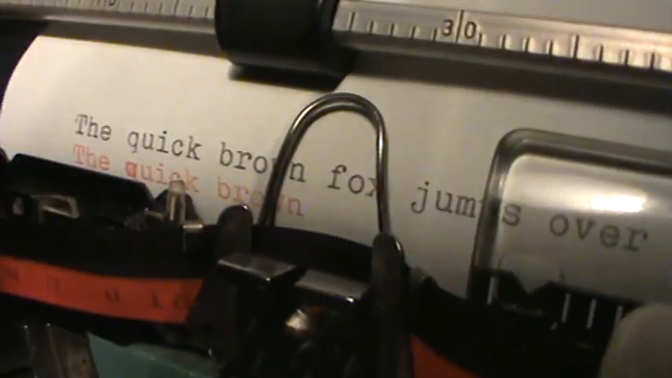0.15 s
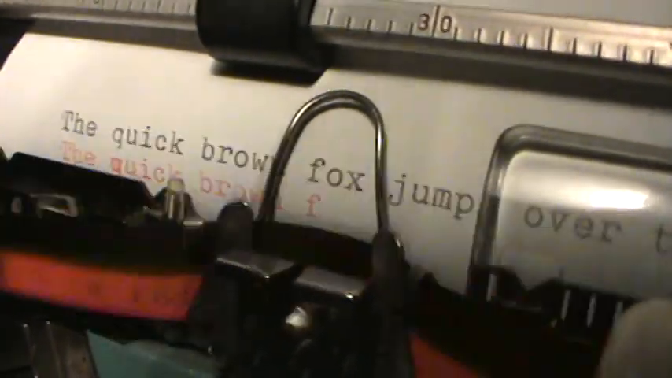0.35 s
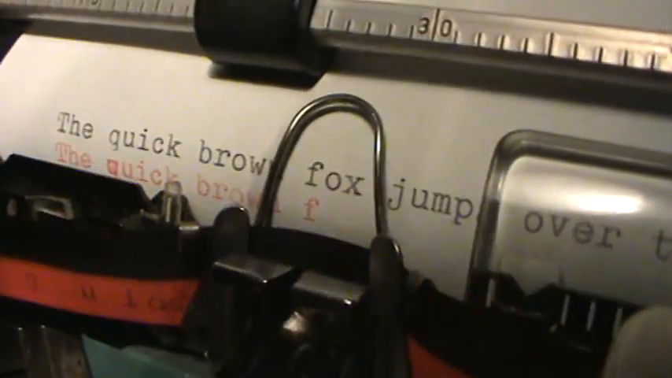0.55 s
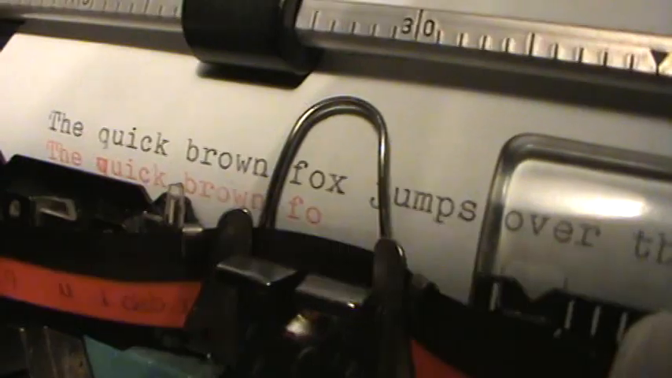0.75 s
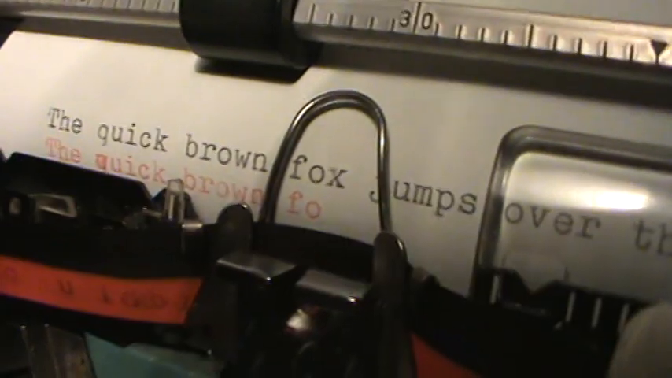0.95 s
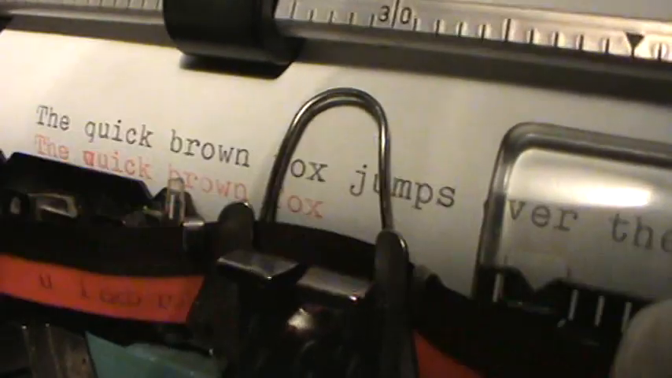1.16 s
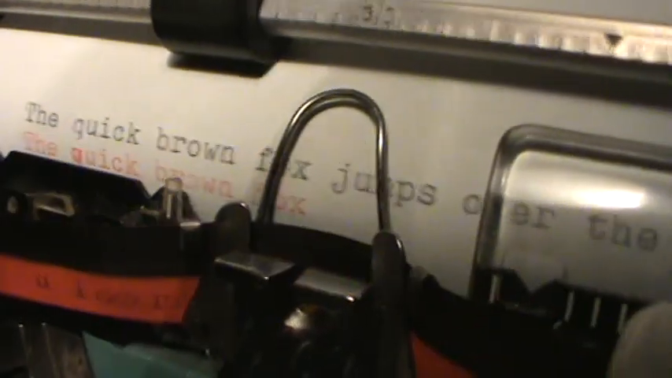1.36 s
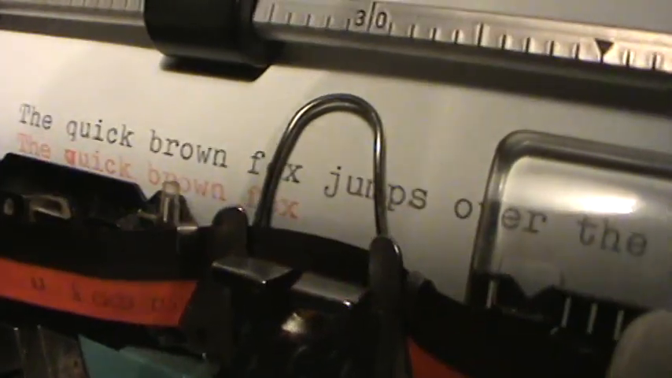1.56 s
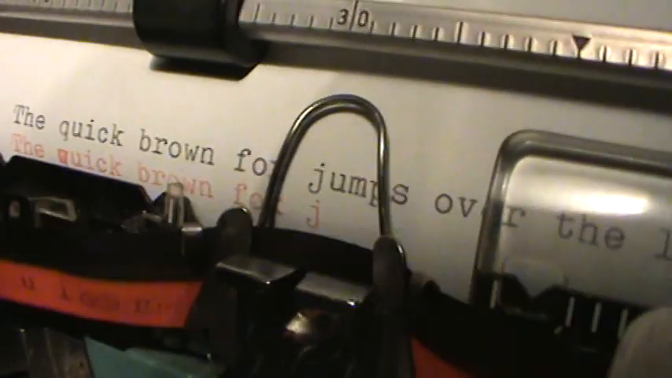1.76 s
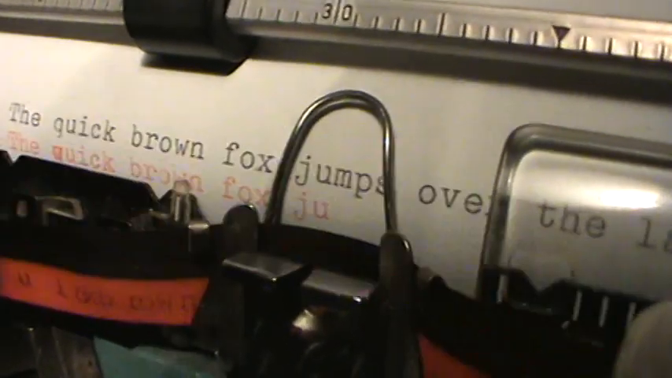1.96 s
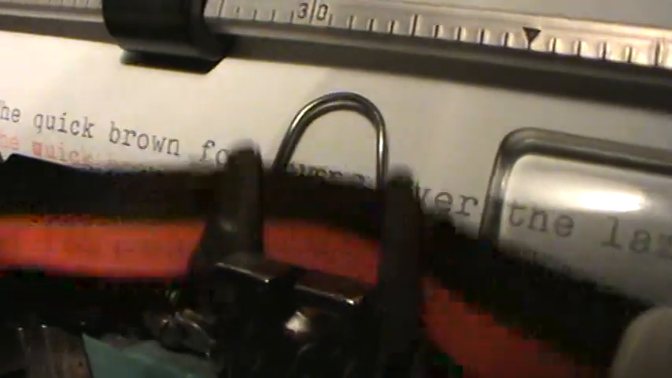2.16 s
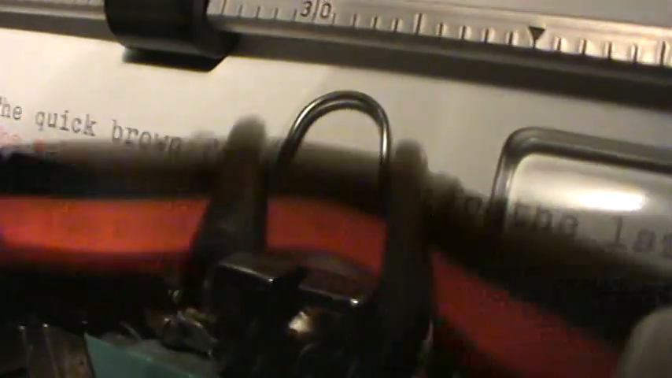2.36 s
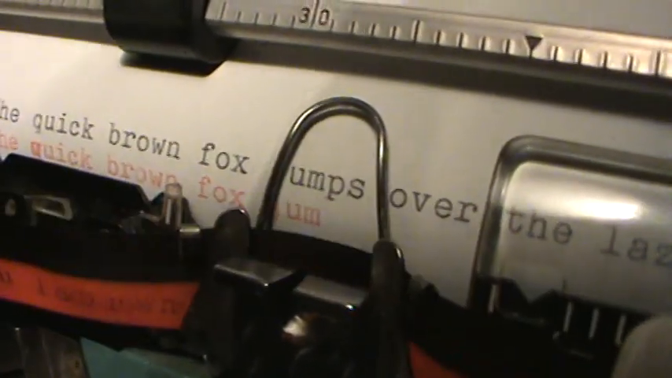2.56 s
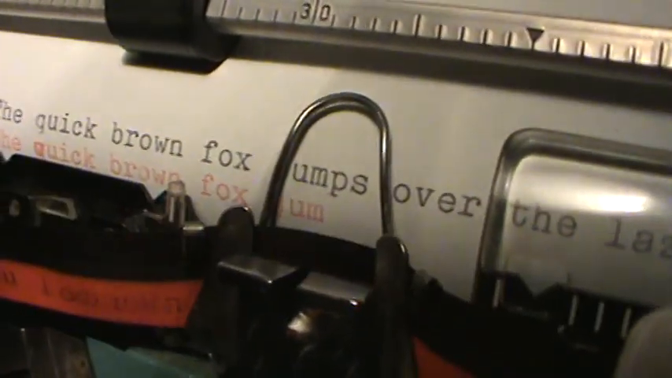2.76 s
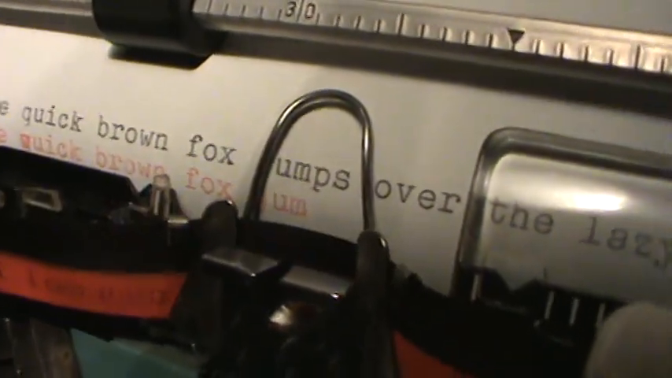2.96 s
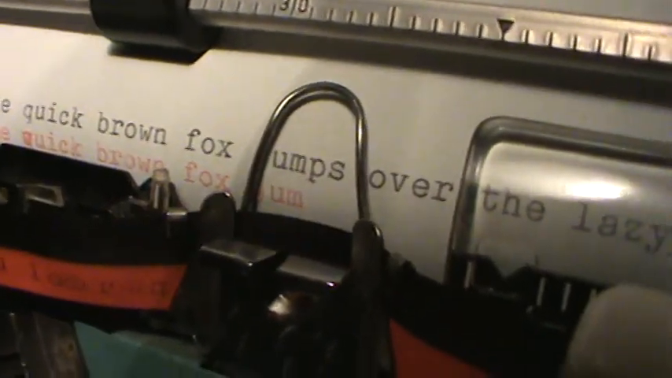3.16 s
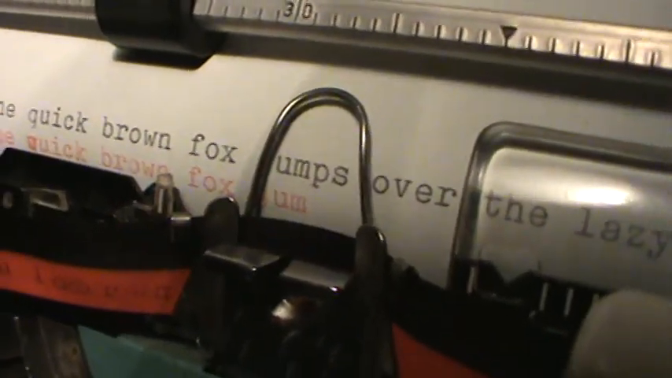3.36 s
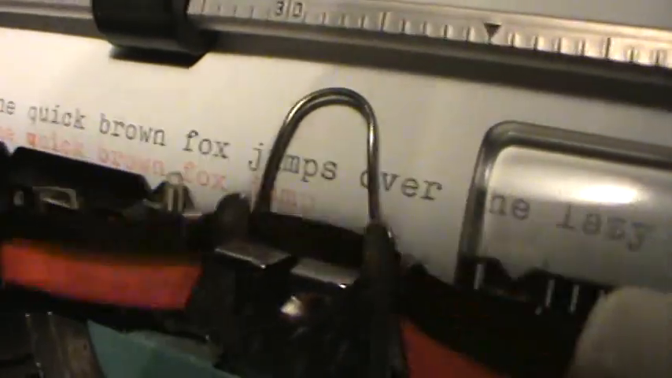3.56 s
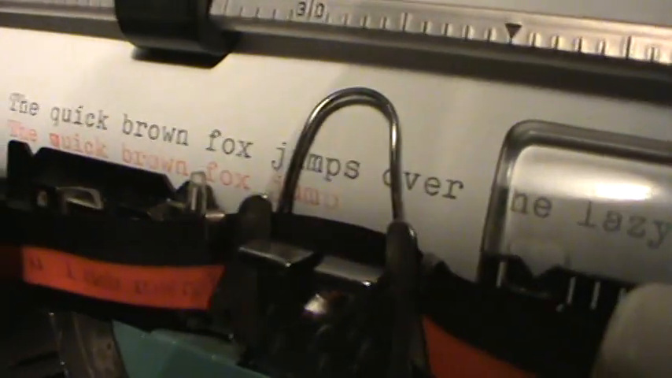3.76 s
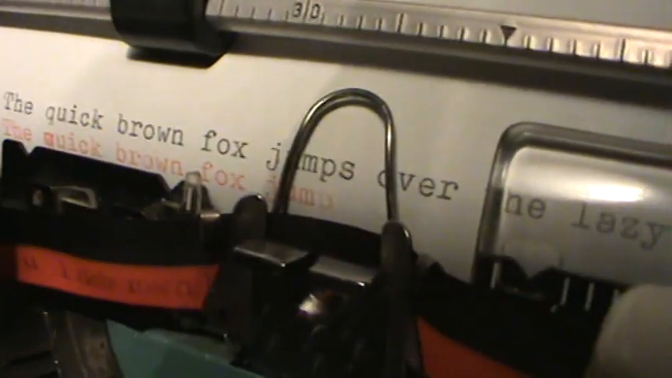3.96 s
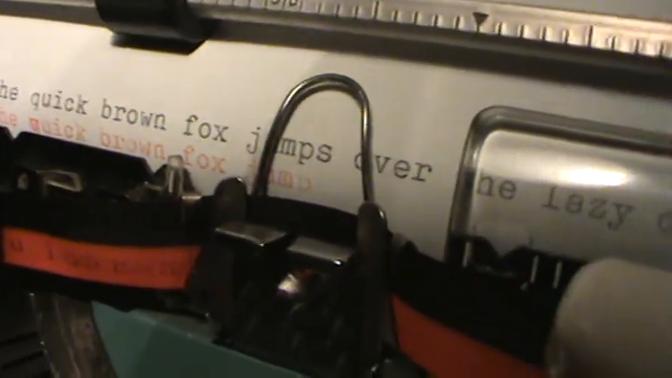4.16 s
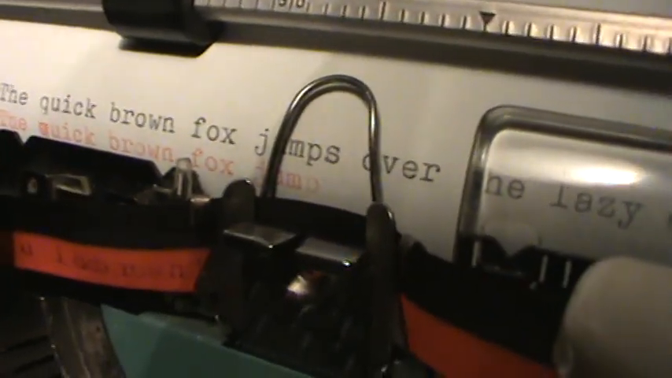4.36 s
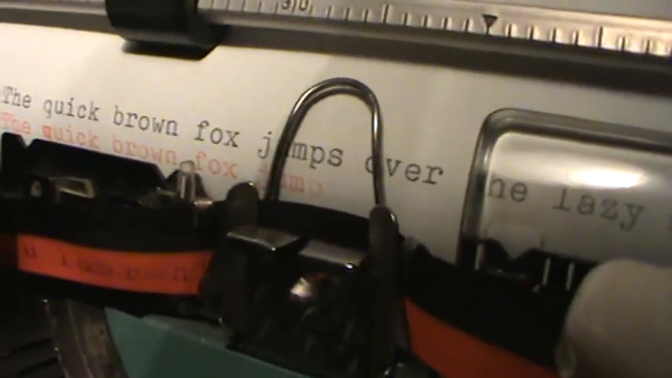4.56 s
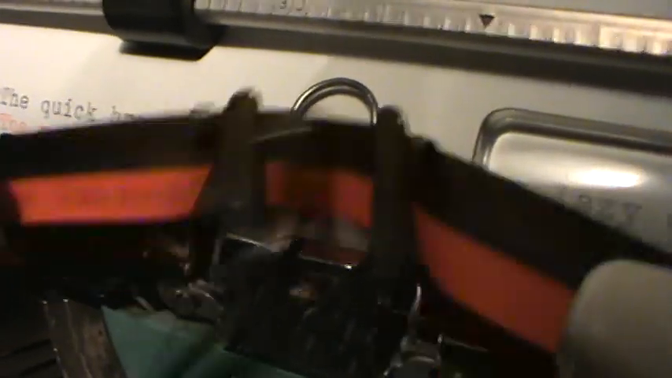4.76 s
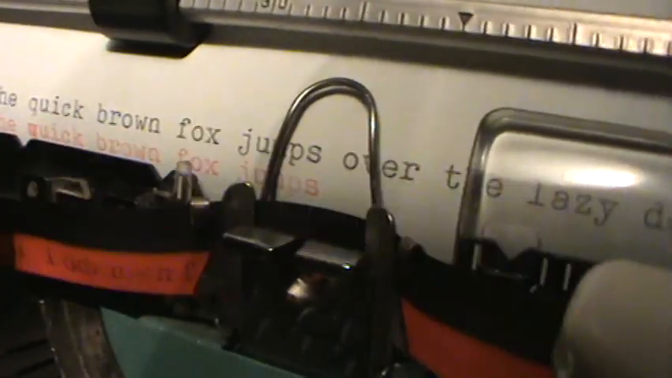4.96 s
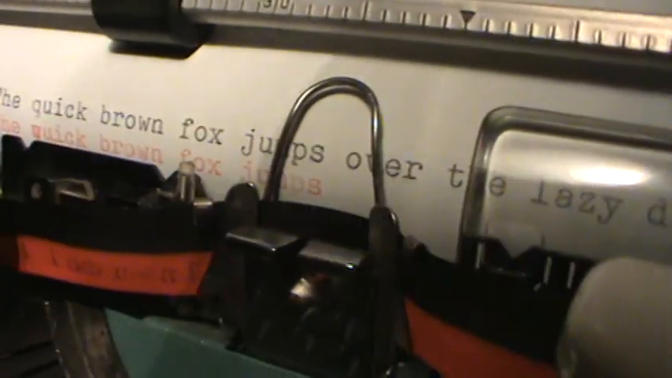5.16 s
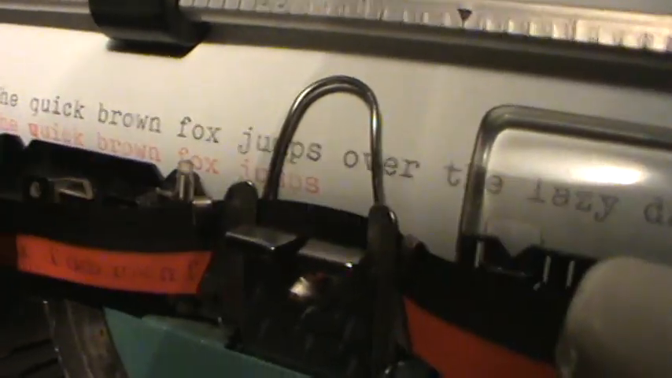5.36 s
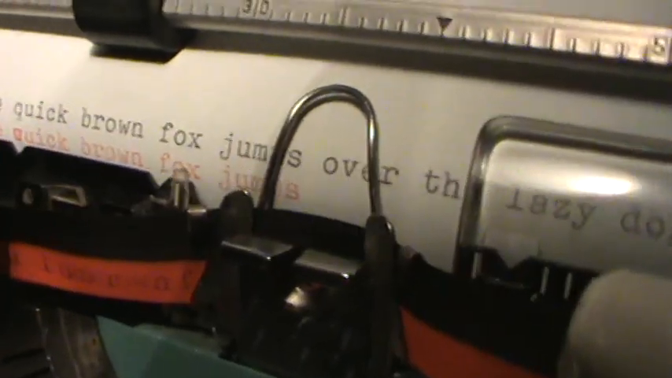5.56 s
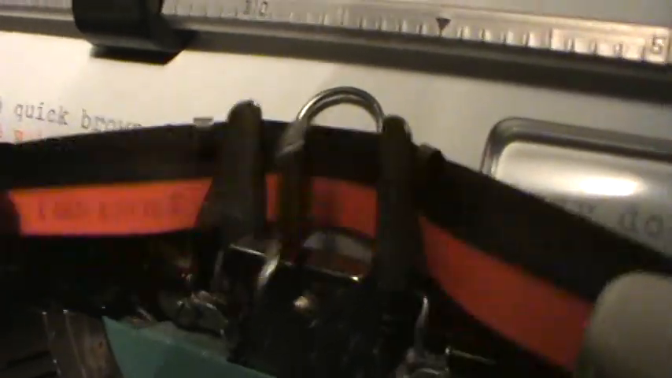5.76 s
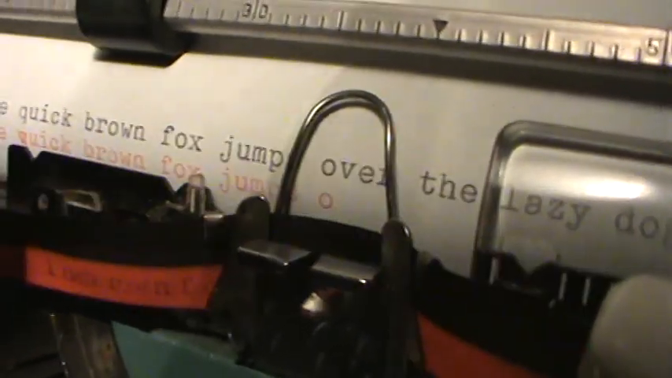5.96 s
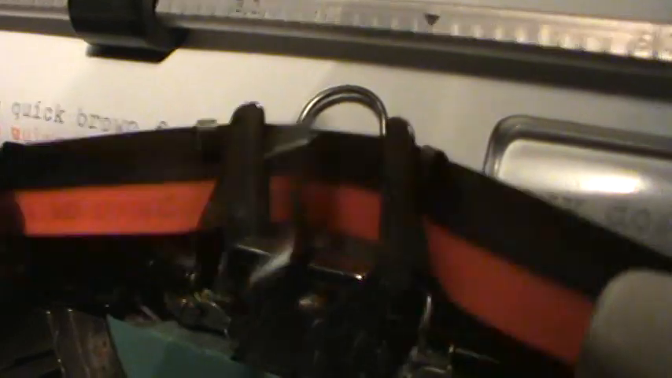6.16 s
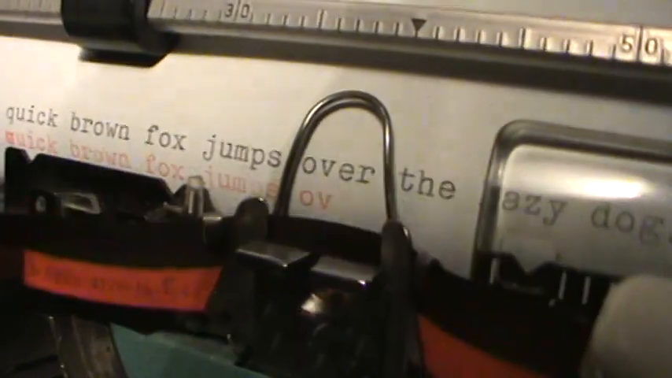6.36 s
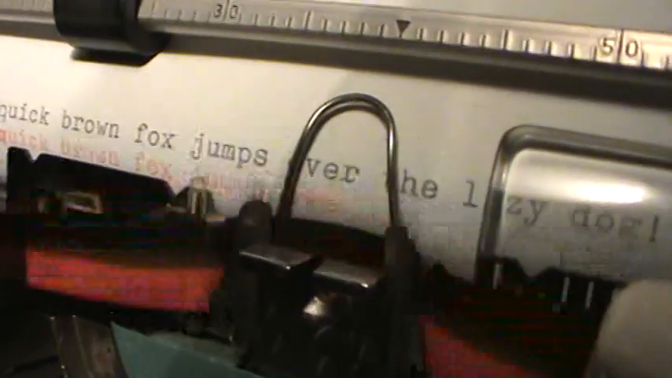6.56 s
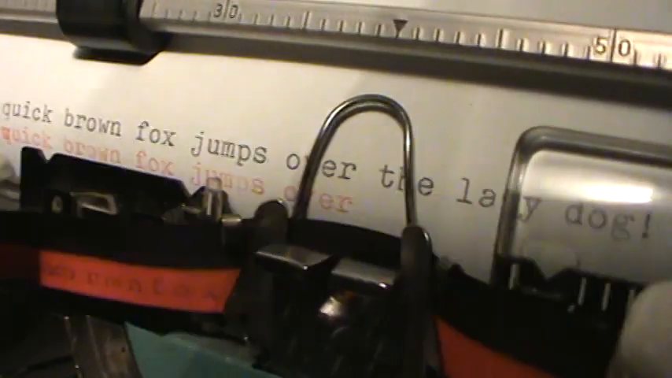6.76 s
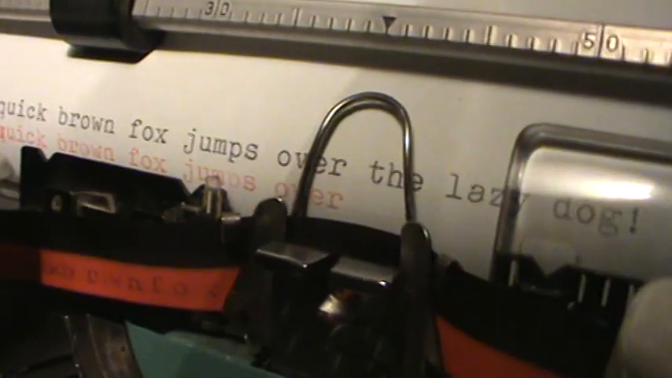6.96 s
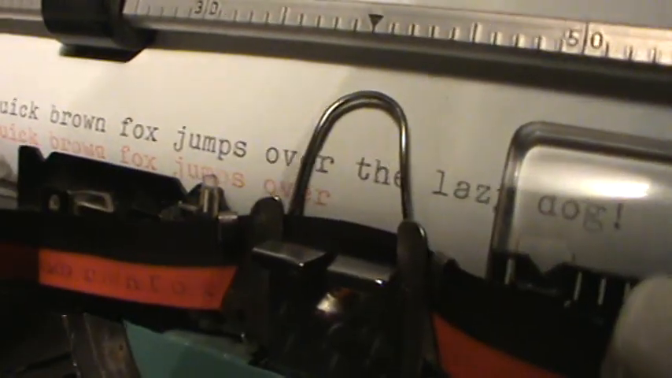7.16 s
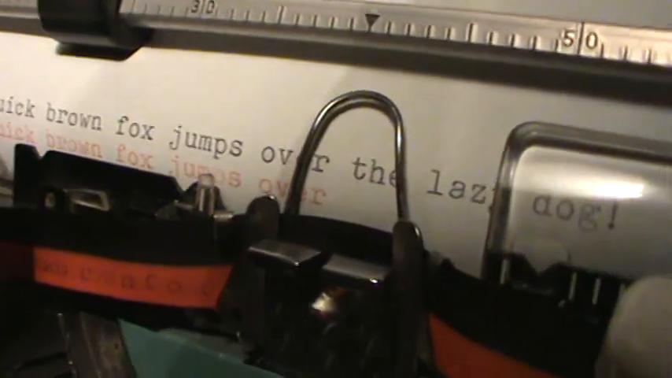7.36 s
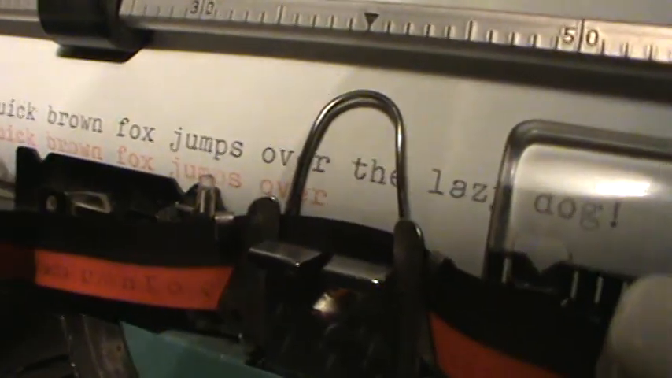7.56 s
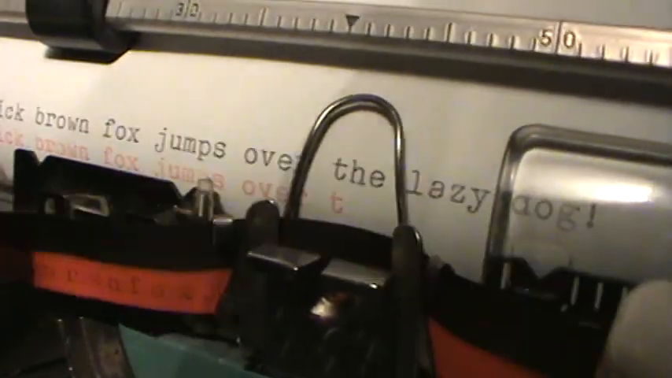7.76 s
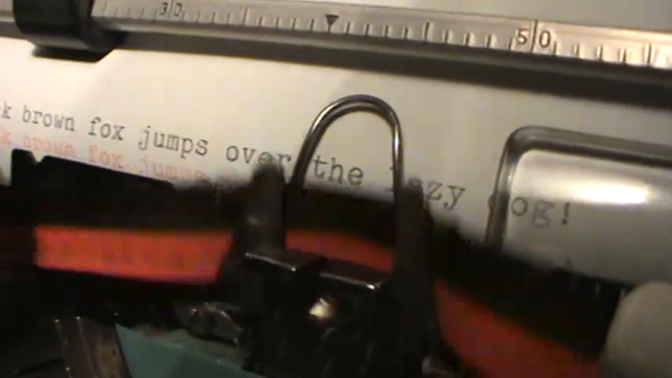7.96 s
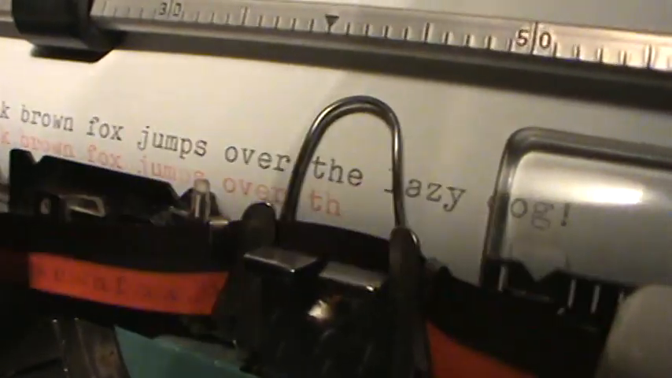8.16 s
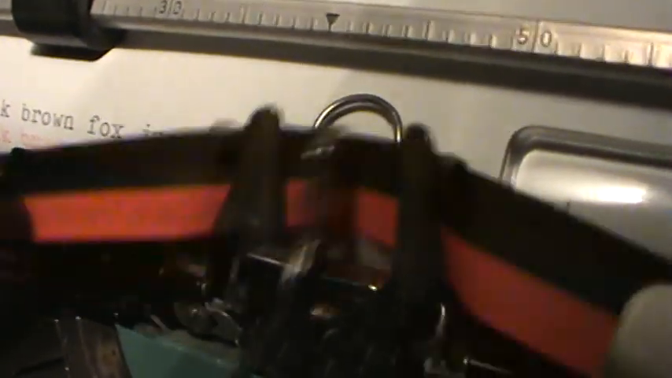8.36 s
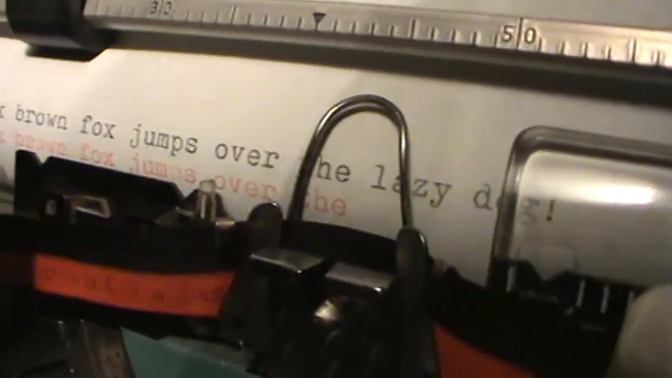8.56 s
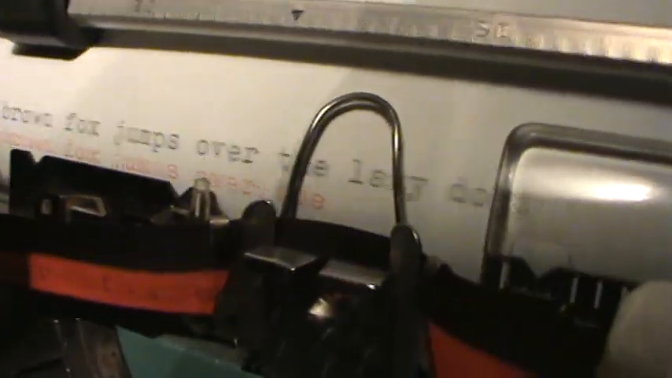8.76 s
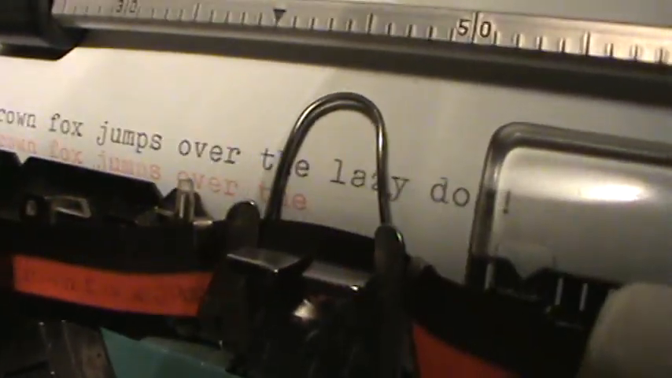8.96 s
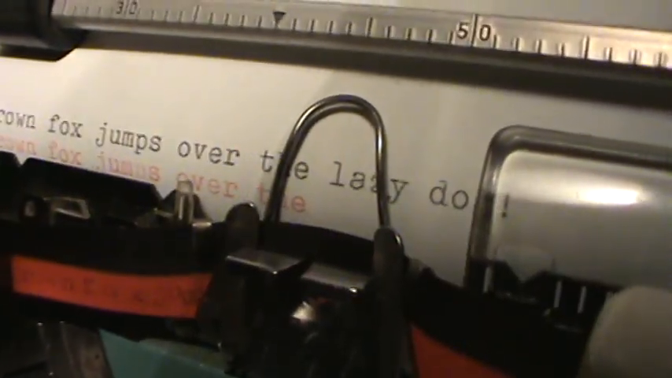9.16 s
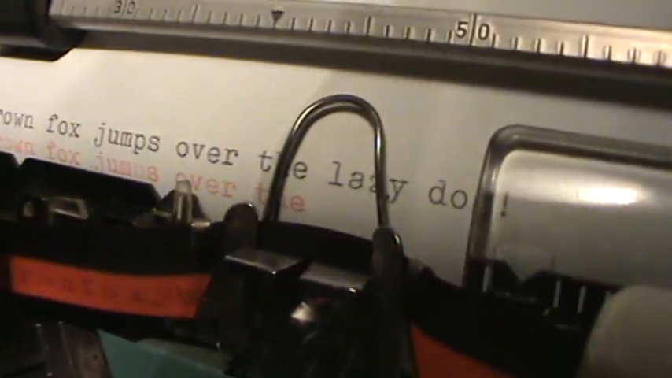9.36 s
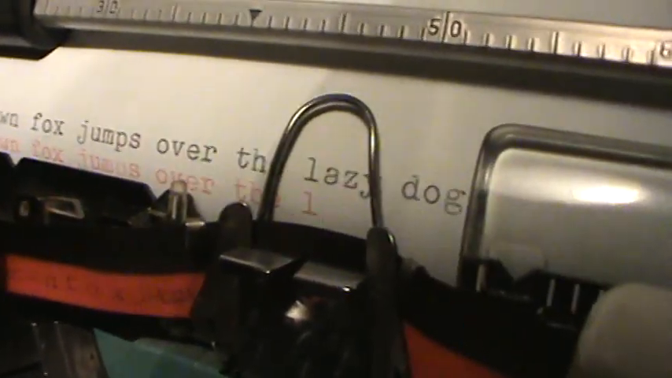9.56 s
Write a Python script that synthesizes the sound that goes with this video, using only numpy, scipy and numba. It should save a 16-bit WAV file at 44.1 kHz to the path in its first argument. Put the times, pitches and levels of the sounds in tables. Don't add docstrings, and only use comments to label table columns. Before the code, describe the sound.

Single typewriter keys clatter and slap paper slowly and irregularly, with occasional hollow space bar thumps, light finger taps and constant low humming.

```python
import sys
import numpy as np
from scipy import signal
from scipy.fft import rfft, irfft, next_fast_len
from scipy.io import wavfile
from scipy.ndimage import uniform_filter1d
from numba import njit

SR = 44100
rng = np.random.default_rng(int(sys.argv[2]) if len(sys.argv) > 2 else 0)


def master_out(mix):
    frames = np.transpose(np.atleast_2d(mix))
    ceiling = np.clip(frames, -1, 1)
    pcm = np.round(ceiling * 32767).astype(np.int16)
    wavfile.write(sys.argv[1], SR, pcm)


def to_linear_factor(level_db):
    exponent = np.asarray(level_db, float) / 20
    return 10 ** exponent


N = 424241
HZ = np.fft.rfftfreq(next_fast_len(N), 1 / SR)

# (1 kHz body re blow [dB], treble re blow [dB], ringing tone [Hz])
LEVER, LINK, BAR, RIBBON = (-9, 0, 9000), (-9.5, -5.5, "link"), (-12, -1, "bar"), (-6.5, 0, 6500)
PAPER, CARRIAGE, PAWL = (0, -3.5, 2910), (-4, -2, 5000), (-4.5, 2.2, 8550)
REST, CUSHION, LATCH = (-4.5, -9.5, 9700), (-8, 0, 4310), (-1, 0.93, 8550)
SPRING, SPACER, STOP = (-0.5, -0.68, 5100), (3.8, -4.5, 1450), (-2.5, -1, 8900)
RACK, PLASTIC, CAP = (-3.5, -1.1, 6100), (8.6, -11, 1700), (4.2, -13, 2130)

# (type meets paper [s], lever trips before [ms], bar falls back after [ms],
# key link tone [Hz], type bar tone [Hz])
LETTERS = [(.272, 40, 120, 5470, 3660), (.65, 42, 97, 2264, 3660), (1.074, 39, 108, 6380, 3670),
           (1.655, 44, 109, 2420, 12090), (1.878, 40, 102, 2610, 6400), (2.1227, 44, 110, 6300, 2744),
           (2.384, 27, 87, 6520, 1960), (3.5252, 61.4, 67, 6330, 2786), (4.7917, 36, 88, 3020, 2850),
           (5.763, 45, 105, 2610, 6910), (6.1892, 47.5, 128, 2370, 6470), (6.469, 50, 94, 2300, 6300),
           (6.628, 65, 100, 6370, 6600), (7.6907, 40, 102, 2410, 3230), (7.923, 42, 103, 3280, 5860),
           (8.3963, 44.3, 89, 2140, 3720), (9.47, 40, 99, 3390, 3630)]
# (trip [dB], slap [dB], carriage step [dB], fall [dB])
FORCES = [(-0.5, 2, -1, -2), (1, -2.5, -6.5, 1.5), (-1.5, 0.5, -3.5, -1), (0, 0, 2.5, -1),
          (0.5, 0.5, 2, -1.5), (-1, 0.5, -2.5, -1.5), (0, -7.5, -8, -3), (-3.5, 1.5, -1, 3),
          (-2, 1.5, 3.5, 2), (1, 0, -1.5, -0.5), (-4, -1.5, 2.5, -1), (-1.5, -1.5, 1, -3),
          (1, -2.5, 1.5, 0), (3.5, 0, 2, -0.5), (1, 0.5, 1.5, -1.5), (-1.5, -2.5, 0.5, 2), (0, -2, 1, 0.5)]
# (pressed [s], bottoms out after [ms], let go after [ms], lands after [ms])
SPACES = [
    (1.287, 14, 96, 105),
    (5.37, 24, 110, 125),
    (6.888, 65, 279, 295),
    (8.694, 30, 95.5, 105.5),
]
# (press [dB], bottom [dB], rack step [dB], let go [dB], landing [dB])
SPACE_FORCES = [
    (7.5, 2.5, 3, -3.5, 3),
    (1.5, 1, 1, 2, 3.5),
    (-4, -18.5, -2, -14.5, -5),
    (-0.5, -2.5, 0, -0.5, -1.5),
]
REBOUND_MS = 34
# (centre [Hz], width [Hz], level [dB])
FRAME = [(93, 34, 2), (142, 58.7, 6), (274.4, 46, -2.5)]
# (centre [Hz], width [Hz], level [dB])
SHELL = [(469.4, 62, -3.5), (528.7, 50.5, -1), (627, 57, -5), (904.4, 24, -10), (1069, 24, -16.5),
         (1477, 42, -10)]


def shape(x, table):
    hz, db = np.transpose(table)
    size = next_fast_len(N)
    gain = to_linear_factor(np.interp(np.log(HZ + 1), np.log(hz), db))
    return irfft(rfft(x, size) * gain, size)[..., :N]


def unit(x):
    return x / np.sqrt(np.mean(x ** 2))


def band(x, lo_hz, hi_hz):
    edges = [lo_hz, min(hi_hz, .45 * SR)]
    passed = signal.sosfilt(signal.butter(2, edges, "band", fs=SR, output="sos"), x)
    return passed * np.sqrt(SR / 2 / (edges[1] - lo_hz))


def ring(x, hz, width_hz):
    return signal.lfilter(*signal.iirpeak(hz, hz / width_hz, fs=SR), x)


def modes(x, table):
    return sum(to_linear_factor(db) * ring(x, hz, width) for hz, width, db in table)


def walk(rate):
    k = int(SR / rate)
    steps = np.repeat(rng.standard_normal(N // k + 1), k)
    return unit(uniform_filter1d(uniform_filter1d(steps, k), k)[:N])


def stereo(mid, side, table):
    side = shape(side, table)
    return np.array([mid + side, mid - side])


def uneven(grain_db, ms, size):
    k = int(ms * SR / 1000) + 1
    luck = np.clip(rng.standard_normal((size, 1, N // k + 1)), -2, 2)
    return uniform_filter1d(np.repeat(to_linear_factor(grain_db * luck), k, axis=2)[..., :N], k)


def chatter(grain_db, grain_ms, count=1):
    grains = uneven(grain_db, grain_ms, size=1)
    patches = uneven(grain_db, 4.5 * grain_ms, size=count)
    return unit(grains * patches * rng.standard_normal((count, 2, N)))


def letter_blows(scatter_db=1.5, detune=.06):
    # (delay [ms], level [dB], rattle length [ms], part)
    trip_rows = [
        (0, -28.5, 22, LEVER),
        (4, -23.5, 10, LINK),
        (18, -25.5, 16, LINK),
    ]
    # (delay [ms], level [dB], rattle length [ms], part)
    slap_rows = [
        (-7.5, -17, 16, BAR),
        (0, -16, 2, PAPER),
        (7.5, -17.5, 23, RIBBON),
    ]
    # (delay [ms], level [dB], rattle length [ms], part)
    move_rows = [
        (29.9, -20.5, 19.5, CARRIAGE),
        (50.6, -29.5, 26, CARRIAGE),
    ]
    # (delay [ms], level [dB], rattle length [ms], part)
    fall_rows = [
        (0, -29, 20.6, REST),
        (0, -21.5, 12.8, CUSHION),
    ]
    groups = (trip_rows, slap_rows, move_rows, fall_rows)
    out = []
    chance = rng.standard_normal((len(LETTERS), sum(len(rows) for rows in groups), 3))
    for (s, lead, fall, link_hz, bar_hz), forces, luck in zip(LETTERS, FORCES, chance):
        own_pitch = {"link": link_hz, "bar": bar_hz}
        stages = [(at, push_db, row)
                  for at, push_db, rows in zip((-lead, 0, 0, fall), forces, groups) for row in rows]
        for (at, push_db, (ms, db, length, part)), (level_luck, treble_luck, pitch_luck) in zip(stages, luck):
            body_db, treble_db, hz = part
            hz = own_pitch.get(hz) or hz * np.exp(detune * pitch_luck)
            out.append((s + (at + ms) / 1000, db + push_db + scatter_db * level_luck,
                        body_db, treble_db + scatter_db * treble_luck, length, hz))
    return out


def space_bar_blows():
    # (level [dB], rattle length [ms], part)
    press, bottom_stop, rack_step = (-39, 15.2, SPACER), (-22.5, 11.7, STOP), (-19, 4, RACK)
    release, landing, rebound = (-24.5, 6.5, LATCH), (-30.5, 24.3, SPACER), (-42, 12, PLASTIC)
    step_ms = 27.5
    out = []
    for (s, bottom, let_go, land), forces in zip(SPACES, SPACE_FORCES):
        press_db, bottom_db, step_db, go_db, land_db = forces
        moments = ((0, press_db, press),
                   (bottom, bottom_db, bottom_stop),
                   (bottom + step_ms, step_db, rack_step),
                   (let_go, go_db, release),
                   (land, land_db, landing),
                   (land + REBOUND_MS, 2 * land_db, rebound))
        for ms, push_db, (db, length, (body_db, treble_db, hz)) in moments:
            out.append((s + ms / 1000, db + push_db, body_db, treble_db, length, hz))
    return out


def blows():
    # (time [s], level [dB], rattle length [ms], part)
    loose_blows = [(.347, -21.5, 19.4, PAWL), (.71, -23, 16.7, RIBBON), (1.056, -20, 10, RIBBON),
                   (2.384, -13, 4, PAPER), (1.138, -26.5, 21, PAWL), (1.846, -31, 24, STOP),
                   (2.433, -26, 16.6, PAWL), (3.486, -5, 14, RIBBON), (3.512, -12.5, 8.6, RIBBON),
                   (5.826, -23, 22.4, PAWL), (6.589, -24, 27, RIBBON), (6.66, -27, 23, PAWL),
                   (8.447, -23, 15, REST), (9.519, -30, 28, CARRIAGE), (.479, -51, 3.8, SPRING),
                   (.846, -42, 4, SPRING), (1.259, -42.5, 3.3, SPRING), (2.311, -49.5, 4.5, SPRING),
                   (2.52, -39.5, 6.2, SPRING), (2.589, -53.5, 6.7, SPRING), (3.703, -50, 7.5, SPRING),
                   (4.986, -40, 3.6, STOP), (5.962, -42.5, 5.3, PAPER), (6.827, -50, 5.6, RACK),
                   (8.107, -51.5, 4.5, PAWL), (8.592, -44, 6.7, SPRING),
                   (.107, -59, 4.9, SPACER), (2.925, -53.5, 6.5, SPRING), (3.111, -54, 12, SPRING),
               (3.8, -47.5, 3, CAP), (4.118, -37.5, 6.8, PLASTIC), (4.17, -49.5, 6, CAP),
               (4.452, -65.5, 10.7, PLASTIC), (2.99, -68, 8, PLASTIC), (6.888, -42, 6, RACK),
               (8.7, -40, 5, RACK), (8.2, -52, 6, SPRING), (6.916, -43, 6.4, SPACER),
               (6.967, -36, 6, CARRIAGE), (7.155, -33, 6.6, LATCH), (7.177, -38, 9, SPACER),
               (8.169, -36.5, 7.3, CUSHION), (8.263, -42, 6, SPACER), (8.31, -41.5, 5.1, SPRING),
               (9.024, -37, 2, RACK)]
    loose = [(s, db, body_db, treble_db, length, hz)
             for s, db, length, (body_db, treble_db, hz) in loose_blows]
    return letter_blows() + space_bar_blows() + loose


def strike_gains():
    # (time from the slap [ms], low and middle [dB], treble [dB])
    strike = [
        (-9, 0, 0),
        (-7, -7, 1),
        (-2.5, -7, 1),
        (-1.2, -14, -11),
        (0, -13, -11),
        (.5, 6, -3),
        (5, 3, -7),
        (9, 0, 0),
    ]
    ms, low_db, treble_db = np.transpose(strike)
    t, slap_s = np.arange(N) / SR, np.array(LETTERS)[:, 0]
    halfway = (slap_s[1:] + slap_s[:-1]) / 2
    since_ms = 1000 * (t - slap_s[np.searchsorted(halfway, t)])
    low = to_linear_factor(np.interp(since_ms, ms, low_db))
    treble = to_linear_factor(np.interp(since_ms, ms, treble_db))
    return np.array([low, low, np.sqrt(low * treble), treble, treble])


def linkage(rise_ms=2.53, rise_share=0.35, sag_db=-4.0, die_ms=2.9, die_share=0.31,
            ring_db=19.5, ring_q=27.0, ring_ms=10, near_db=2.0):
    edges_hz = (700, 1900, 3600, 7000, 10500, 14500)
    source = chatter(grain_db=3.0, grain_ms=1.1, count=6)
    t = np.arange(SR // 8) * 1000 / SR
    drive, parts = np.zeros((5, N)), np.zeros((2, N))
    for s, db, body_db, treble_db, ms, hz in blows():
        span = slice(int(s * SR), min(int(s * SR) + len(t), N))
        fits = span.stop - span.start
        rattle = to_linear_factor(db + sag_db * np.minimum(t / ms, 1))
        dying = np.exp(-np.maximum(t - ms, 0) / (die_ms + die_share * ms))
        env = rattle * dying * np.minimum(t / min(rise_ms, rise_share * ms), 1) ** 2
        shares_db = np.array([body_db, -4.5, 0.34 * treble_db - 2.5, treble_db - 2.5,
                              treble_db - 0.62 * body_db - 8.0])
        own_region = np.arange(5) == np.searchsorted(edges_hz, hz) - 1
        shares_db = shares_db + near_db * own_region
        drive[:, span] = np.hypot(drive[:, span], np.outer(to_linear_factor(shares_db), env[:fits]))
        kick = (env * np.exp(-t / ring_ms))[:fits] * source[-1][:, span]
        parts[:, span] += ring(kick, hz, hz / ring_q)
    regions = (drive * strike_gains())[:, None] * source[:-1]
    clatter = sum(band(*region) for region in zip(regions, edges_hz, edges_hz[1:]))
    push = uniform_filter1d(drive[0], int(.012 * SR), origin=int(0.0054 * SR))
    shake = push * rng.standard_normal((2, N))
    bodies = to_linear_factor(18.5) * modes(shake, FRAME) + to_linear_factor(14.0) * modes(shake, SHELL)
    return to_linear_factor(-0.5) * clatter + to_linear_factor(ring_db) * parts + bodies


def frame_blows():
    # (time [s], level [dB], main tone [Hz], hollow cover re level [dB])
    jolts = [(.631, -16, 194, -12), (1.427, -7.5, 143.4, -2.5), (3.57, -19, 114, -6.5),
             (4.119, -13.5, 182, -19.5), (4.169, -18.5, 179, -23), (6.218, -13.5, 236, -1),
             (6.529, -12.5, 151.6, -7), (7.752, -12, 155, -6.5), (8.722, -15, 108, -6),
             (9.501, -12.5, 142, -7)]
    # (level [dB], main tone [Hz], hollow cover [dB])
    space_thumps = [
        (-32.5, 160, 6.5),
        (-8, 266, -0.5),
        (-9, 286, -1.5),
        (-8, 277, -6.5),
        (-8.5, 150, -9),
    ]
    # (delay [ms], level [dB], main tone [Hz], hollow cover re level [dB])
    trip_thump, step_thump = (18, -24.5, 193, -5), (31, -22.5, 148.5, 5.5)
    out = list(jolts)
    for (s, lead, *_), (trip_db, _, step_db, _) in zip(LETTERS, FORCES):
        for at, push_db, thump in ((-lead, trip_db, trip_thump), (0, step_db, step_thump)):
            ms, db, hz, cover_db = thump
            out.append((s + (at + ms) / 1000, db + push_db, hz, cover_db))
    for (s, bottom, _, land), (press_db, bottom_db, *_, land_db) in zip(SPACES, SPACE_FORCES):
        moments = ((0, press_db), (bottom + 1, bottom_db), (land + 1, land_db),
                   (land + 11, land_db), (land + REBOUND_MS, 2 * land_db))
        for (ms, push_db), (db, hz, cover_db) in zip(moments, space_thumps):
            out.append((s + ms / 1000, db + push_db, hz, cover_db))
    return out


def thumps(push_ms=2.0, spread_db=3.0, t60=0.053):
    out, t = np.zeros((2, N + SR)), np.arange(SR // 4) / SR
    dull = frame_blows()
    chance = rng.standard_normal((len(dull), 2, len(FRAME + SHELL), 2))
    for (s, db, hz, cover_db), luck in zip(dull, chance):
        main_tone = np.sin(2 * np.pi * hz * t) * np.exp(-np.log(1000) * t / t60)
        blow = main_tone * np.array([[1], [.6]])
        for k, (mode_hz, width, mode_db) in enumerate(FRAME + SHELL):
            share_db = -8.5 if k < len(FRAME) else cover_db + 0.5
            size = to_linear_factor(mode_db + share_db + spread_db * luck[:, k, :1])
            turn = 2 * luck[:, k, 1:]
            tone = np.sin(2 * np.pi * mode_hz * (1 + turn / 160) * t + turn)
            blow = blow + size * tone * np.exp(-np.pi * width * t)
        start = int(s * SR)
        out[:, start:start + len(t)] += to_linear_factor(db) * blow * (1 - np.exp(-t * 1000 / push_ms)) ** 2
    return out[:, :N]


def singing(rise_s=.004, side_share=.5):
    # (time [s], level [dB], tone [Hz], time to fade by 60 dB [s])
    steel = [(0.47, -69, 7760, .9), (1.42, -65, 7760, .9), (5.88, -69, 7760, .9), (13, -70, 7760, .8),
             (3.6, -42, 1300, 0.4), (2.39, -40, 9540, 0.2)]
    out, t = np.zeros(N), np.arange(N) / SR
    falls = [(s + fall / 1000, -20.5 + force[-1], 9540, .07)
             for (s, _, fall, *_), force in zip(LETTERS, FORCES)]
    for s, db, hz, t60 in steel + falls:
        span = slice(int(s * SR), int((s + t60) * SR))
        since = t[span] - s
        env = np.clip(since / rise_s, 0, 1) * np.exp(-np.log(1000) * since / t60)
        out[span] += to_linear_factor(db) * env * np.sin(2 * np.pi * hz * since)
    return out * np.array([[1], [side_share]])


def scuffs():
    # (time [s], length [s], level [dB], centre [Hz])
    rubs = [
        (2.93, .2, -68, 9500),
        (9.232, 0.1, -51.5, 830),
        (3.3, 0.031, -68.5, 7000),
        (3.2, 0.07, -55, 1500),
    ]
    out, t = 0, np.arange(N) / SR
    rub = chatter(grain_db=2.5, grain_ms=2)[0]
    for s, length, db, hz in rubs:
        env = np.clip((t - s) / .005, 0, 1) * np.clip(1.4 - (t - s) / length, 0, 1)
        out = out + to_linear_factor(db) * env * band(rub, hz / 2, hz * 2)
    return out


def room(x, low_t60=0.25, high_t60=0.19, low_db=-8.5, high_db=-14.5):
    t, out = np.arange(SR // 2) / SR, 0
    for lo_hz, hi_hz, t60, db in (79, 1510, low_t60, low_db), (1390, 7700, high_t60, high_db):
        fade = np.exp(-np.log(1000) * t / t60)
        tail = band(rng.standard_normal((2, len(t))), lo_hz, hi_hz) * fade
        tail = tail * np.sqrt((hi_hz - lo_hz) / (SR / 2) / np.sum(fade ** 2))
        out = out + to_linear_factor(db) * signal.fftconvolve(x[None], tail, axes=1)[:, :N]
    return out


def motor():
    # (tone [Hz], rms level [dB], wobble [dB])
    hum = [(119.4, -43, 1.0), (242.6, -63, 2), (356.5, -59.5, 2.5), (429.3, -56, 2)]
    out, t = 0, np.arange(N) / SR
    for hz, db, wobble_db in hum:
        level = np.sqrt(2) * to_linear_factor(db + wobble_db * walk(8.1))
        out = out + level * np.sin(2 * np.pi * hz * t + 0.51 * wobble_db * walk(4))
    return out


def camera_ticks(drift_db=3.5):
    # (tone [Hz], width [Hz], level [dB], lost on every second tick [dB])
    pings = [(2300, 240, -59, 11.5), (2760, 200, -60, 2), (3360, 500, -68.5, -3), (5750, 330, -64, 4)]
    first_s, rate_hz = .0068, 29.97
    at = (np.arange(first_s, N / SR - .01, 1 / rate_hz) * SR).astype(int)
    out = 0
    for hz, width, db, weak_db in pings:
        clicks = np.zeros(N)
        weak = weak_db * (np.arange(len(at)) % 2)
        clicks[at] = to_linear_factor(35.0 - weak + 1.5 * rng.standard_normal(len(at)) + drift_db * walk(1.7)[at])
        out = out + to_linear_factor(db) * ring(ring(clicks, hz, width), hz, width)
    return out


def room_air():
    # (frequency [Hz], level per Hz [dB])
    colour = [(20, -10.5), (65, -10.5), (123, -6), (216, -18.5), (434, -21), (520, -28), (950, -37.5),
              (2750, -45.5), (16000, -50.5)]
    return to_linear_factor(-46.5 + .6 * walk(4.2)) * unit(shape(rng.standard_normal((2, N)), colour))


def scene():
    # (frequency [Hz], side re mid [dB])
    hit_side = [(40, -10), (90, -14), (250, -4), (500, -8), (3000, -2.5), (15000, -7)]
    # (frequency [Hz], side re mid [dB])
    floor_side = [(40, -15.5), (110, -20.5), (640, -1), (1400, 4), (15000, -7.5)]
    mid, side = linkage() + thumps() + scuffs() + singing()
    wet = room(mid)
    machine = stereo(mid + wet[0], side + wet[1], hit_side)
    quiet = room_air() + camera_ticks()
    return machine + stereo(quiet[0], quiet[1], floor_side) + motor()


@njit
def gain_control(x, top, slope, attack, release):
    gain, e = np.empty(len(x)), 0.
    for i in range(len(x)):
        e += (x[i] - e) * (attack if x[i] > e else release)
        gain[i] = min(1., (top / (e + 1e-9)) ** slope)
    return gain


def band_limit(x):
    return signal.sosfilt(signal.butter(12, 16820, fs=SR, output="sos"), x)


def record(dry):
    heard = signal.sosfilt(signal.butter(2, 62, "high", fs=SR, output="sos"), dry)
    heard = signal.sosfilt(signal.ellip(8, .2, 22, 15800, fs=SR, output="sos"), heard)
    loudest = np.abs(heard).max(axis=0)
    attack_s, release_s = .0004, .03
    gain = gain_control(loudest, to_linear_factor(-16), .65, 1 / (attack_s * SR), 1 / (release_s * SR))
    return band_limit(np.clip(to_linear_factor(4.0) * gain * heard, -1, 1))


dry = scene()
out = record(dry)
master_out(out)
```